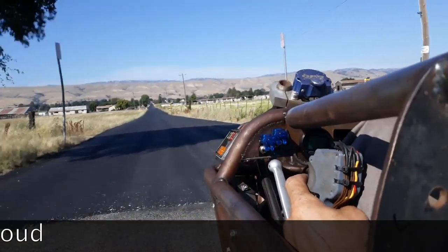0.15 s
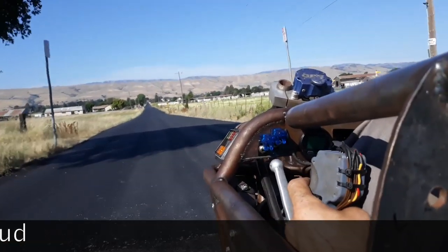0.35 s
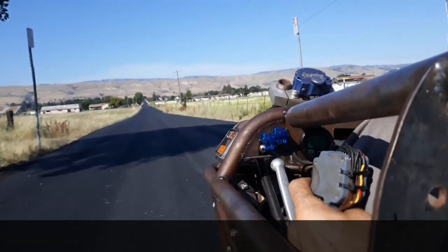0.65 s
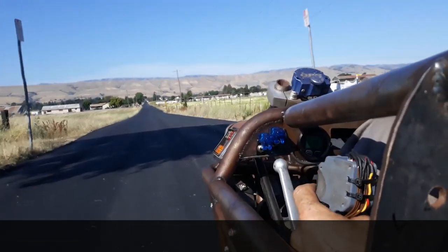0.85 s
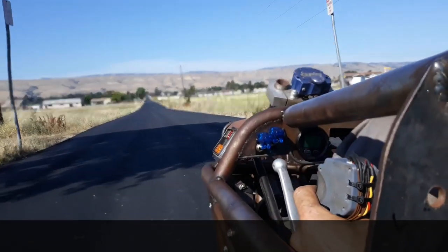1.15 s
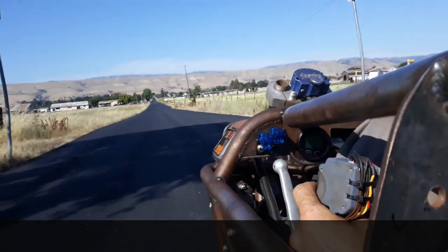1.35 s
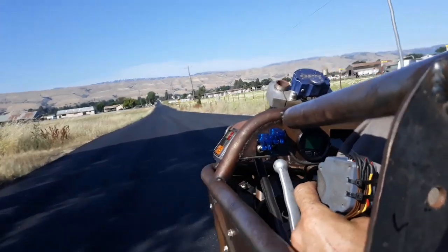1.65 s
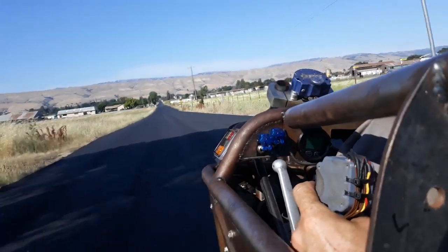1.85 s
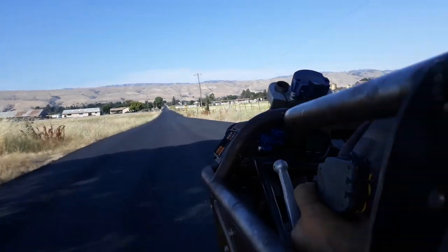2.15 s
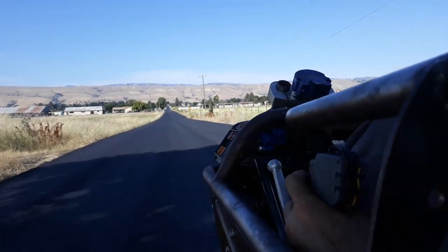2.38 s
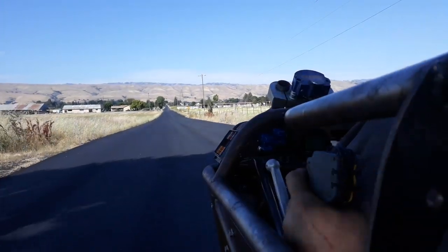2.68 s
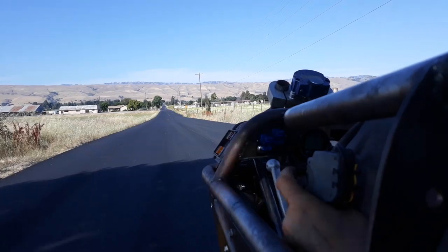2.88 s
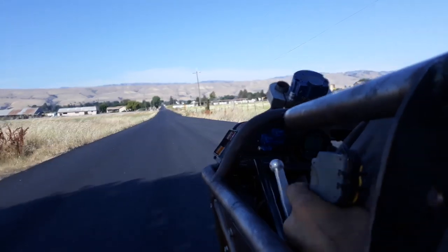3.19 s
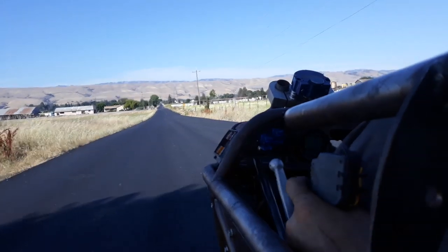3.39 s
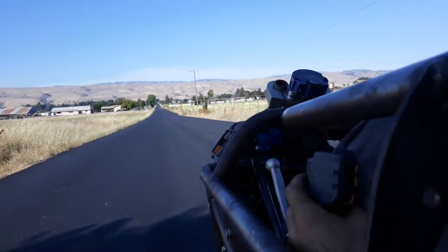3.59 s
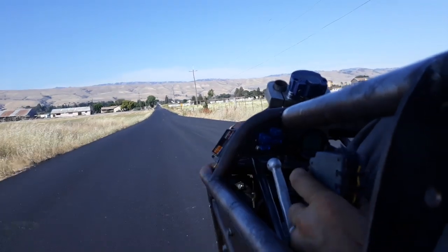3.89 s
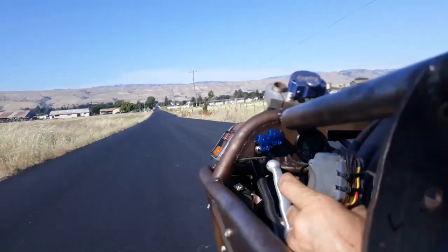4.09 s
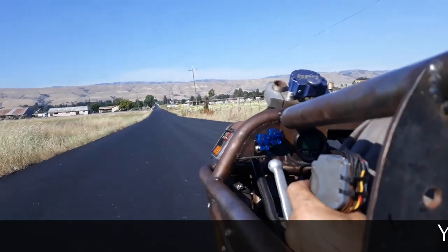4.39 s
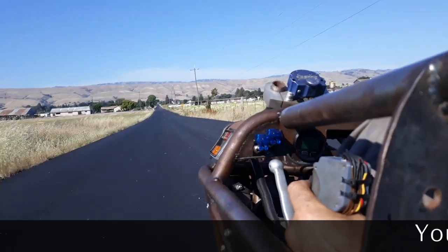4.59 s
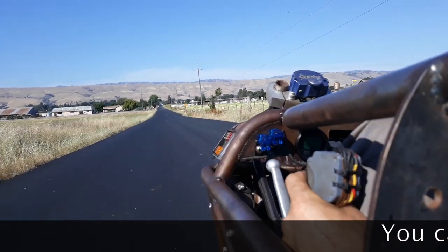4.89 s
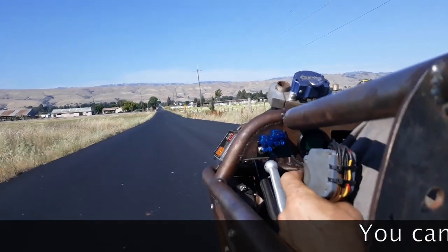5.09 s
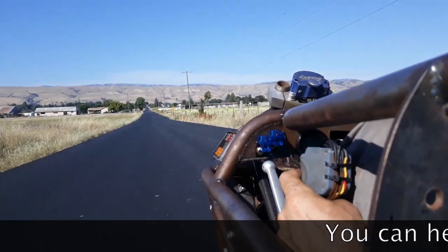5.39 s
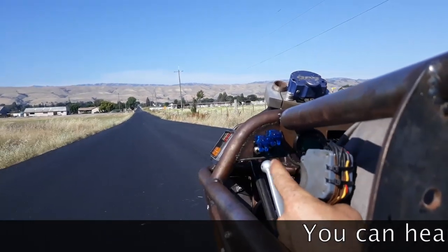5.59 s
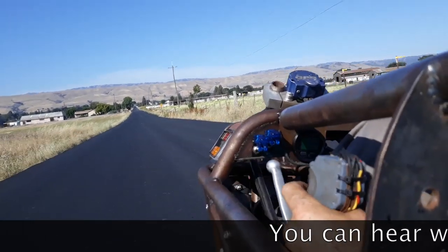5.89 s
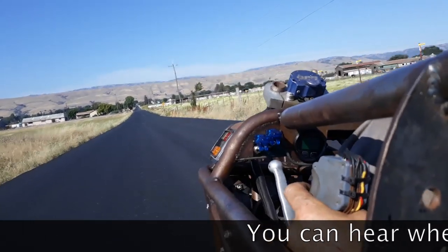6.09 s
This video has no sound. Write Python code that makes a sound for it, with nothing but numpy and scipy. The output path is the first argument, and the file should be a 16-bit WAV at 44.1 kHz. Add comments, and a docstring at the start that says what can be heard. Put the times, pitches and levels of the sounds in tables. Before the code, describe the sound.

Close metallic rolling rattle on a paved road, broken by a sudden near-silent gap with a fading tube ring, then more grinding and brief touches.

```python
"""An asphalt road, close under an open steel-tube vehicle on small hard wheels, which lift off three times
and touch down again. The two microphone ports ride on the rims, at no distance from the blows.
Random blows from the stones of the road ring resonances of frame, panel, tubes and rims; rough spots scrape,
grit clicks, small parts tick and single knocks thud. Sine tones make a beating whine, decaying sines a fading
tube, shaped noise a soft road hiss: these are left while the wheels are off the ground."""
import sys
import numpy as np
from scipy.fft import rfft, irfft, next_fast_len
from scipy.io import wavfile
from scipy.ndimage import uniform_filter1d, map_coordinates

SR = 44100
rng = np.random.default_rng(int(sys.argv[2]) if len(sys.argv) > 2 else 0)


def store_wav(level_fs):
    """Save 16-bit WAV to argv[1]."""
    pcm = np.round(np.clip(np.atleast_2d(level_fs), -1, 1) * 32767)
    wavfile.write(sys.argv[1], SR, pcm.T.astype(np.int16))


N = 275625

# whine tones: (frequency [Hz], relative level [dB])
WHINE_TONES = [(2113, -80), (2153, -65.5), (2192, -66), (2245, -78), (6578, -79)]
# rise and fall of the whine: (time [s], gain [dB])
WHINE_SWELL = [(0, 6), (.3, 1), (2, -6), (2.4, 0), (5.3, 0), (5.5, 2), (6.25, 1)]
# spectrum of road and air: (frequency [Hz], relative density [dB per Hz])
HISS_SPECTRUM = [(25, -32), (99, -4.5), (156, -6), (220, 1.5), (809, -0.5), (1060, -3.5), (2140, -4.5),
                 (4540, -7.5), (6000, -14), (7200, -10), (8700, -29.5), (10500, -24.5), (12500, -23.5),
                 (15700, -30)]
# rise and fall of the hiss: (time [s], gain [dB])
HISS_SWELL = [(0, 9.5), (.3, -4), (2.4, 2.5), (2.8, 4.5), (5.3, 1.5), (6.25, 6.5)]
# hiss at the two ports: (frequency [Hz], left-right likeness [0-1])
HISS_LIKENESS = [(60, 0.15), (400, 0.41), (2000, 0.021), (15000, .02)]
# tones of the long tube: (frequency [Hz], relative level [dB], time to fall 60 dB [s])
LONG_TUBE_TONES = [(641, 0, .8), (687, 0, .35)]
# the long tube is struck: (time [s], level [dB])
LONG_TUBE_STRIKES = [(0, -52), (2.3, -38), (5.2, -53), (5.48, -58)]
# rough spots under a rim: (time [s], relative peak level [dB], brightness [dB per octave])
ROUGH_SPOTS = [(0.099, -45, 5), (0.12, -23, 2), (0.154, -23.5, 4), (0.263, -24, 1), (0.278, -21.5, 6),
               (0.407, -23.5, 3), (0.497, -23, -1), (0.622, -22.5, -4), (0.786, -28, -6), (0.8444, -34, 12),
               (0.921, -39, 9), (0.9862, -32, 8), (1.081, -33.5, -9), (1.2405, -37.5, -14),
               (1.372, -33.5, 5), (1.41, -46, 2), (1.52, -43, -6), (1.619, -43, 1), (1.795, -48, -2),
               (1.92, -34, -3), (2.153, -29, -1), (2.244, -36, -5), (2.32, -28, -4), (3.025, -19.5, 0.5),
               (3.279, -28, -3), (3.437, -21, -1), (3.572, -26, -2), (3.639, -23.5, -1), (3.722, -29, -1),
               (3.767, -23, -5), (3.855, -25, -7), (4.023, -21.5, -4), (4.101, -27, -10),
               (4.168, -22.5, -4), (4.23, -31, 1), (4.327, -39, -4), (4.399, -35, 15), (4.44, -34, -8),
               (4.574, -29.5, -10), (4.7013, -31.5, -9), (4.773, -27, 2), (4.846, -37, -12),
               (4.914, -35.5, -13), (5.0214, -34, -9), (5.1094, -29, -5), (5.17, -38, -9),
               (5.418, -47.5, 23), (5.8, -45, 16), (5.95, -43, 17), (6.07, -30, 7)]
# four touches, each from touchdown to the start of lift-off:
# (time [s], load on the wheels [dB], frame share [dB], panel share [dB])
TOUCHES = [
    [(0.1, -42.5, 0, -11), (0.11, -38, -3, -10), (0.16, -36, -2.5, 1), (0.25, -39.5, -9, -17),
     (0.28, -32.5, -4.5, -18), (0.32, -42, 9.5, 13.5), (0.46, -40, 3.5, -1), (0.51, -34, -5, -3),
     (0.56, -39, 8, 4.5), (0.61, -37, 3, 6), (0.63, -33.5, -9, -10), (0.66, -38.5, 3, 6.5),
     (0.75, -37, -11, -4.5), (0.88, -36.5, 4, -0.5), (0.94, -36, -2, 4.5), (0.97, -41.5, 4, 14),
     (1.0, -29.5, -5, -9), (1.03, -40, 2.5, 9.5), (1.13, -40, -11, -10), (1.17, -39.5, 3, 8),
     (1.21, -45, -9, -4), (1.25, -46, 1, 0), (1.3, -52, 4.5, 0), (1.37, -39.5, -0.5, -4),
     (1.43, -44.5, 3, -4), (1.5, -48.5, 5, 9), (1.57, -44.5, 1.5, -3), (1.64, -47, 4.5, -1.5),
     (1.72, -47, 5.5, -2), (1.8, -45, -1.5, 3.5), (1.87, -45, 5, -7), (1.92, -43, -6, 3),
     (1.95, -46.5, 0, 3), (2.02, -53, 7.5, -4), (2.09, -45, 2, 9), (2.15, -42.5, 0, -1),
     (2.2, -43.5, 0, 0.5), (2.24, -43.5, 0, -3), (2.31, -42, -5, -2.5), (2.35, -45.5, -5, -17),
     (2.39, -49, -7, -10)],
    [(2.94, -41.5, -8, -14), (3.02, -35, -4.5, -15), (3.06, -33.5, -1, 1), (3.08, -34.5, -8, -3),
     (3.13, -37.5, -3, 7), (3.15, -33, -6.5, -2), (3.28, -36.5, -2, 6.5), (3.32, -39, 1.5, 2),
     (3.41, -35, -8, 6), (3.46, -36, -0.5, -5), (3.49, -39, 0, 7.5), (3.65, -39.5, -9, -3.5),
     (3.68, -41, -3, 1), (3.86, -35.5, -6, -3.5), (4.17, -41, 2.5, 8), (4.22, -37.5, -8, 0),
     (4.41, -41, 1.5, 10.5), (4.43, -37.5, -2, 2.5), (4.67, -42, 1, 5.5), (4.83, -36.5, -5.5, 1.5),
     (4.86, -44.5, -5, -7), (4.89, -43, -1, 3), (4.94, -45, -13, 0), (5.09, -45, -4, -1),
     (5.115, -39.5, -16, 3), (5.15, -40.5, -6, -2), (5.17, -42, -18, -24), (5.2, -44.5, -6, -12)],
    [(5.422, -46, -16, -14), (5.446, -50, -1, -6), (5.472, -44, -13, 1), (5.5, -52, 3, 3)],
    [(5.799, -41.5, -18, -17), (5.823, -39, -3, -25), (5.857, -34, -3, 3), (5.879, -40.5, 6.5, -3.5),
     (6.127, -37.5, 0.5, -3), (6.171, -37.5, 7.5, -5), (6.25, -35, 1, 2)],
]
# the wheel hops: (landing time [s], depth [dB])
HOPS = [(0.263, 0), (1.323, -7), (1.61, -5), (1.759, -8), (1.846, -28), (1.963, -9), (2.059, -8)]
# resonances of the frame: (frequency [Hz], width [Hz], relative level [dB])
FRAME_MODES = [(263.9, 22.2, 4), (304, 33, 1.5)]
# resonances of the panel: (frequency [Hz], width [Hz], relative level [dB])
PANEL_MODES = [(488, 26, -7), (509, 16, 0)]
# resonance of the belly: (frequency [Hz], width [Hz], relative level [dB])
BELLY_MODES = [(208, 34, 0)]
# belly against the frame: (time [s], level [dB])
BELLY_SHARE = [(0, -16.5), (1.5, -12.5), (2.9, -3.5), (4.75, -3.5), (5.1, -10.5), (5.8, -12), (6.25, -38)]
# resonances of the tubes: (frequency [Hz], width [Hz], relative level [dB])
TUBE_MODES = [(604, 24, -5), (677, 13, 0), (770, 17, -2.5), (829, 14, -8.5), (918, 18, -9), (1006, 28, -8),
              (1163, 30, -10), (1311, 18, -12), (1427, 30, -19)]
# resonances of the rims: (frequency [Hz], width [Hz], relative level [dB])
RIM_MODES = [(1570, 40, -9), (1685, 40, -2.5), (1772, 40, -1), (1950, 35, -4), (2099, 30, 1),
             (2232, 35, -4.5), (2425, 70, 0.5), (2690, 50, 2.5), (2835, 30, 0), (3040, 60, -8),
             (3630, 40, -4), (3905, 60, -5.5), (4000, 50, -10), (4300, 70, -10), (4960, 90, -7.5),
             (5260, 45, -13), (6530, 80, -12), (7170, 71, -11.5)]
# resonance of the hub: (frequency [Hz], width [Hz], relative level [dB])
HUB_MODES = [(3308, 30, 0)]
# hub against the rims: (time [s], level [dB])
HUB_SHARE = [(0.1, -12.5), (1, -11.5), (1.6, -14), (2.3, -6.5), (3, -10.5), (4.2, -10.5), (4.55, -5.5),
             (5.2, -16), (5.8, -13)]
# stone sizes, by the pitch of their click: frequency [Hz]
GRIT_HZ = [500, 1000, 1700, 2700, 4200, 6500, 11000]
# spectrum of the grit between the resonances: (frequency [Hz], relative density [dB per Hz])
GRIT_SPECTRUM = [(210, -86), (350, -17), (424, -9.5), (555, -15), (763, -13), (1490, -21), (2730, -27),
                 (3410, -29), (7080, -34.5), (8700, -51.5), (10300, -63), (12000, -45), (15000, -49.5),
                 (15700, -46)]
# spectrum of the shaking camera mount: (frequency [Hz], relative density [dB per Hz])
MOUNT_SPECTRUM = [(20, -18), (30, 25), (52, 1), (72, 23.5), (110, 12), (150, -42)]
# small parts ring once: (time [s], relative force level [dB], pitch [Hz])
TICKS = [(0.845, -26, 5000), (0.935, -22, 5000), (1.25, -28, 3310), (1.373, -32, 4960), (1.62, -27, 5340),
         (1.8, -35, 3650), (2.158, -33, 4990), (4.335, -24, 4970), (4.743, -22.5, 4940), (5.1, -25, 4960),
         (5.183, -24.5, 3300), (5.464, -30, 3520)]
# single knocks in the frame: (time [s], relative level [dB])
KNOCKS = [(2.824, -43.5), (2.843, -47), (5.424, -40.5), (5.4637, -37.5), (5.473, -37), (5.486, -39),
          (5.499, -42), (5.766, -46)]
# short ring of a hard knock: (frequency [Hz], width [Hz], relative level [dB])
THUD_MODES = [(580, 130, -1), (900, 140, -17)]
# vehicle sound at the two ports: (frequency [Hz], left-right likeness [0-1])
LIKENESS = [(25, 1), (70, 0.49), (200, 0.76), (400, 0.95), (800, 1), (1200, 0.39), (1700, 0.68),
            (3000, 0.17), (7000, 0.46), (12000, 0.23), (15000, 0.14)]
# the left port lags the right: (frequency [Hz], phase [radians])
LEFT_LAG = [(100, 0.29), (300, 0.34), (700, 1.07), (1100, 1.72), (1400, 2.74), (1700, 0.69), (4000, 1.66),
            (4500, 0.8), (5200, 2.5), (7000, 1.56), (15000, 3.6)]

HISS_DB = -59.5  # before the swell
TOP_HZ = 15740  # upper band limit of the microphone
LIFT_DB_PER_S, BODY_LIFT_DB_PER_S = 181, 280  # fall of the blows, and of frame and panel, as the wheels leave
BUILD_S = 0.027  # time constant of frame and panel coming into swing after a touchdown
RIM_DB, RIM_GROWS, RIM_PIVOT_DB = -7, 1.234, -32.5  # rims swing wider than the load around the pivot
SWAY_DB, SWAY_PER_S = 0.84, 8.3  # frame and panel each swell and sink by chance
HOP_S = 0.018  # length of the fade before a landing
SCRAPE_RISE_S, SCRAPE_ROUND = 0.0077, 1.06  # time to the peak; larger = rounder start, quicker end
FORCE_UNDER_PEAK_DB = 17.5  # force of a scrape below its listed peak
SCRAPE_LOW_HZ = 1200  # scrapes are weak below this pitch
RATTLE_DB, RATTLE_PER_S = 2.4, 35  # the rims are shaken in short bursts
TICK_WIDTH_HZ = 25


def amp(db):
    """Gain of a level in dB."""
    return 10 ** (np.asarray(db) / 20)


def unit(x):
    """x at rms 1."""
    return x / np.sqrt(np.mean(x ** 2) + 1e-20)


def along(points, hz):
    """(Hz, value) points on a log axis."""
    f, v = np.transpose(points)
    return np.interp(np.log(hz + 1), np.log(f + 1), v)


def in_time(points):
    """(s, value) points, one value per sample."""
    return np.interp(np.arange(N) / SR, *np.transpose(points))


def wobble(rate):
    """A smooth random curve, rate knots a second."""
    knots = rng.standard_normal(int(N * rate / SR) + 4)
    return map_coordinates(knots, [np.arange(N) * rate / SR])


def filtered(x, response):
    """x times a complex response of frequency."""
    m = next_fast_len(N + SR // 2)
    return irfft(rfft(x, m) * response(np.fft.rfftfreq(m, 1 / SR)), m)[..., :N]


def unit_gain(response):
    """A response scaled to mean power 1."""
    return response / np.sqrt(np.mean(np.abs(response) ** 2))


def modes(table):
    """Causal response of damped resonances with alternating sign, power gain 1 for white noise."""
    def response(f):
        total = 0
        for k, (centre, width, db) in enumerate(table):
            damping = 1j * f * width
            total = total + (-1) ** k * amp(db) * damping / (centre ** 2 - f * f + damping)
        return unit_gain(total)
    return response


def colour(spectrum):
    """Response of a spectrum, power gain 1 for white noise."""
    return lambda hz: unit_gain(amp(along(spectrum, hz)))


def ports(pair, alike, lag):
    """Two unrelated signals become left and right with the given likeness and lag."""
    def mid_side(hz):
        turn = np.arccos(np.clip(along(alike, hz), 0, 1)) / 2
        return np.array([np.cos(turn), np.sin(turn)])

    mid, side = filtered(pair, mid_side)
    left_right = np.array([mid + side, mid - side])
    return filtered(left_right, lambda hz: np.exp(.5j * along(lag, hz) * np.array([[-1], [1]])))


def whine():
    """Sine tones, most of them close enough to beat, each wavering slightly in level and phase."""
    t = np.arange(N) / SR
    apart = np.array([[0], [1.2]])  # phase between the ports, radians
    tones = 0
    for hz, db in WHINE_TONES:
        level = np.sqrt(2) * amp(db + 2.3 * wobble(14))
        tones = tones + level * np.sin(2 * np.pi * hz * t + .35 * wobble(10) + apart)
    return tones * amp(in_time(WHINE_SWELL))


def hiss():
    """Tyres and air rush softly all the time as shaped noise; the low part is lumpier."""
    rush = filtered(rng.standard_normal((2, N)), colour(HISS_SPECTRUM))
    low = filtered(rush, lambda hz: 1 / (1 + (hz / 900) ** 4))
    rush = rush - low + low * amp(1.8 * wobble(25))
    level_db = HISS_DB + in_time(HISS_SWELL) + 0.25 * wobble(2.5) + 0.3 * wobble(22)
    return amp(level_db) * ports(rush, HISS_LIKENESS, [(100, 0.0038)])


def long_tube():
    """A struck tube rings on: two tones start softly and fall exponentially."""
    t, ring = np.arange(N) / SR, np.zeros(N)
    for s, db in LONG_TUBE_STRIKES:
        since = np.clip(t - s, 0, None)
        onset = 1 - np.exp(-since / .012)
        for hz, level_db, t60 in LONG_TUBE_TONES:
            decay = amp(db + level_db - 60 * since / t60)
            ring += decay * onset * np.sin(2 * np.pi * hz * since + .45 * wobble(30))
    return ports(np.array([ring, 0 * ring]), [(600, 1.0)], LEFT_LAG)


def scrapes(hz):
    """Force of the rough spots as felt at one pitch: a quick rise and a slower fall."""
    force = np.zeros(N + SR)
    u = np.arange(SR // 5) / SR / SCRAPE_RISE_S
    pulse = (u * np.exp(1 - u)) ** SCRAPE_ROUND
    octaves = np.log2(np.clip(hz, 1700, 5500) / 3000)
    for s, db, bright_db in ROUGH_SPOTS:
        force[round(s * SR):][:len(u)] += amp(db - FORCE_UNDER_PEAK_DB + bright_db * octaves) * pulse
    return force[:N] / (1 + (SCRAPE_LOW_HZ / hz) ** 2)


def touching():
    """Gain of tubes, frame, panel and rims: blows start at once on touchdown and fall steadily on lift-off."""
    t, gains = np.arange(N) / SR, np.zeros((4, N))
    for rows in TOUCHES:
        s, load_db, frame_db, panel_db = np.transpose(rows)
        load, frame, panel = (np.interp(t, s, c) for c in (load_db, frame_db, panel_db))
        since = np.clip(t - s[0], 0, None)
        lifted = np.clip(t - s[-1], 0, None)
        blows = (since > 0) * amp(-LIFT_DB_PER_S * lifted)
        swing = (1 - np.exp(-since / BUILD_S)) * amp(-BODY_LIFT_DB_PER_S * lifted)
        mean_load = uniform_filter1d(load, size=SR // 6)  # rims feel the mean load
        rim = RIM_PIVOT_DB + RIM_DB + RIM_GROWS * (mean_load - RIM_PIVOT_DB)
        gains += [blows * amp(load), swing * amp(load + frame), swing * amp(load + panel), blows * amp(rim)]
    gains[1:3] *= amp(SWAY_DB * np.array([wobble(SWAY_PER_S), wobble(SWAY_PER_S)]))
    return gains


def hops():
    """The load fades before each landing and returns at once."""
    t, dip_db = np.arange(N) / SR, np.zeros(N)
    for s, db in HOPS:
        dip_db += db * np.clip(1 - (s - t) / HOP_S, 0, 1) ** .5 * (t < s)
    return amp(dip_db)


def stones(rate, spread_db):
    """Two trains of blows at random moments with uneven but bounded strength, rms 1."""
    hit = rng.random((2, N)) < rate / SR
    strength = amp(spread_db * np.minimum(rng.exponential(size=N), 3))
    return unit(hit * strength * rng.uniform(-0.97, 1, (2, N)))


def droning(table, steady):
    """Resonances fed with noise all the time; the larger the swing, the more it is damped."""
    ring = filtered(rng.standard_normal((2, N)), modes(table))
    swing = np.abs(uniform_filter1d(ring ** 2, size=SR // 60)) + 0.15
    return unit(ring / swing ** (np.clip(steady, 0, 1) / 2))


def struck(force, table, flutter_db, drift_db, rate):
    """Each stone lands elsewhere and favours other modes, so every mode has its own blows."""
    sound = 0
    for hz, width, db in table:
        uneven = amp(flutter_db * wobble(40) + drift_db * wobble(5))
        blows = force(hz) * uneven * stones(rate, spread_db=3.5)
        sound = sound + amp(db) * np.sqrt(width / 60) * filtered(blows, modes([(hz, width, 0)]))
    return sound


def grit(force):
    """Stones of every size click on their own, each size in its part of the spectrum."""
    sound = 0
    for k, hz in enumerate(GRIT_HZ):
        own_size = np.arange(len(GRIT_HZ)) == k
        share = lambda f: np.sqrt(np.interp(np.log(f + 1), np.log(GRIT_HZ), own_size))
        blows = (force + scrapes(hz)) * amp(1.97 * wobble(30)) * stones(rate=.4 * hz + 500, spread_db=2.0)
        sound = sound + filtered(blows, lambda f: share(f) * colour(GRIT_SPECTRUM)(f))
    return sound


def belly(frame):
    """The belly booms with the smoothed swing of the frame, its drone passed twice through its resonance."""
    boom = unit(filtered(droning(BELLY_MODES, steady=0.043), modes(BELLY_MODES)))
    return uniform_filter1d(frame, size=SR // 12) * amp(in_time(BELLY_SHARE)) * boom


def wheels():
    """Blows from the road ring every part of the vehicle."""
    tubes, frame, panel, rims = touching() * hops()
    judder = amp(0.53 * wobble(25))  # the load on the wheel flutters
    sound = judder * (frame * droning(FRAME_MODES, steady=0.22) + panel * droning(PANEL_MODES, steady=0.49))
    sound += belly(frame)
    sound += amp(0.83) * struck(lambda hz: tubes * judder, TUBE_MODES, flutter_db=1.47, drift_db=2.2, rate=1600)
    rattle_db = 0.75 * wobble(18) + RATTLE_DB * np.abs(wobble(RATTLE_PER_S))
    rim_force = rims * amp(rattle_db) * judder
    sound += amp(-12.0) * struck(lambda hz: rim_force + scrapes(hz), RIM_MODES,
                                 flutter_db=3.0, drift_db=0.77, rate=600)
    # the hub rings more evenly than the rims
    sound += (rim_force + scrapes(3500)) * amp(in_time(HUB_SHARE)) * droning(HUB_MODES, steady=0.13)
    sound += amp(3.0) * grit(rim_force)
    shaking = (frame + tubes) * rng.standard_normal((2, N))
    sound += amp(-36.5) * filtered(shaking, colour(MOUNT_SPECTRUM))
    return ports(sound, LIKENESS, LEFT_LAG) * amp([[-.7], [.7]])  # right port slightly louder


def ticks():
    """Light high ticks of small parts, each one damped sine."""
    ring, u = np.zeros((2, N + SR)), np.arange(SR // 8) / SR
    decay = np.exp(-np.pi * TICK_WIDTH_HZ * u)
    for s, db, hz in TICKS:
        ring[0, round(s * SR):][:len(u)] += amp(db - 16) * decay * np.sin(2 * np.pi * hz * u)
    return ports(ring[:, :N], LIKENESS, LEFT_LAG)


def knocks():
    """Single impulses ring belly and frame; a harder one also thuds higher up."""
    push, hard = np.zeros((2, 2, N))
    for s, db in KNOCKS:
        push[0, round(s * SR)] = amp(db + 17.5)
        hard[0, round(s * SR)] = amp(2 * db + 57.5)  # the thud grows twice as fast in dB
    body = filtered(push, modes(BELLY_MODES + FRAME_MODES[:1]))
    thud = filtered(hard, modes(THUD_MODES))
    return ports(body + thud, LIKENESS, LEFT_LAG)


def scene():
    """All sources at the two microphone ports."""
    return whine() + hiss() + long_tube() + wheels() + ticks() + knocks()


def record(dry):
    """The microphone passes nothing above its band limit."""
    return filtered(dry, lambda hz: hz < TOP_HZ)


dry = scene()
out = record(dry)
store_wav(out)
```